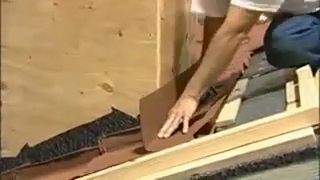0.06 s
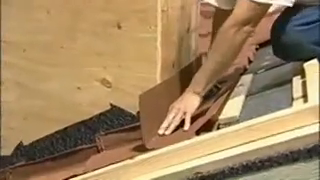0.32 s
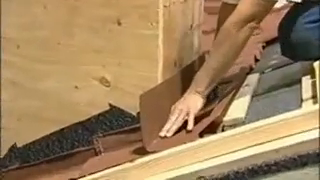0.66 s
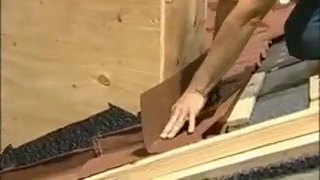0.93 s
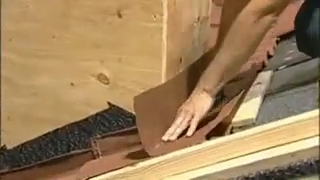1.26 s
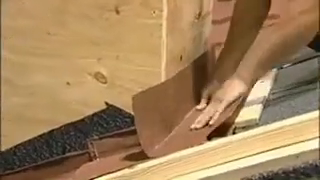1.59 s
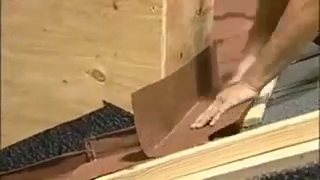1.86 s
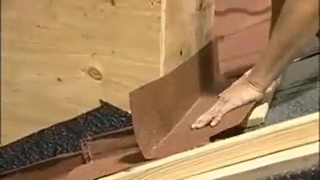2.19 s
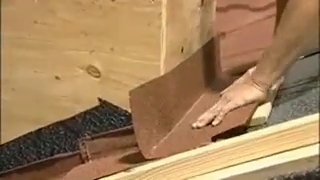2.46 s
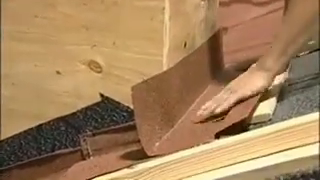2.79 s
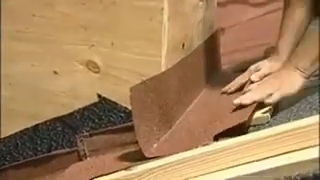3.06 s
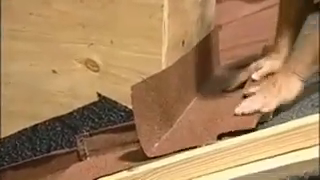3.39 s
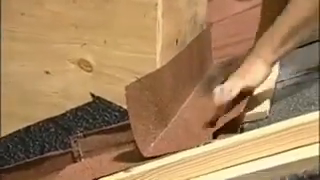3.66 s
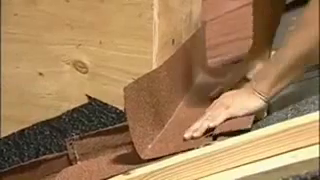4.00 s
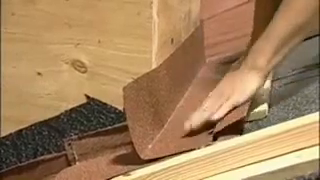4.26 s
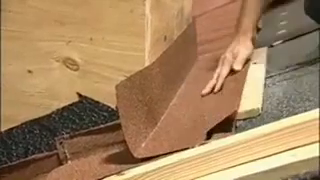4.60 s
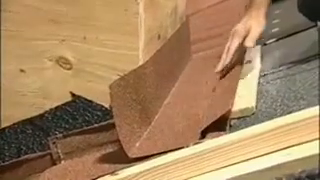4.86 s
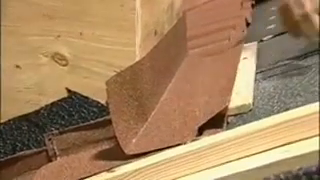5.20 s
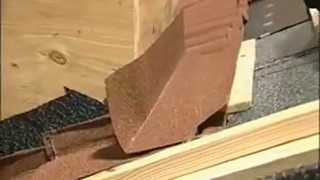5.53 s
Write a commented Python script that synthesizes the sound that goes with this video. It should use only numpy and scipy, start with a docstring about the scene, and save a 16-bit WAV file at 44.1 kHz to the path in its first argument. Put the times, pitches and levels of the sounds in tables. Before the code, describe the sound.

Hands press a gritty coated metal sheet against roof tiles and a wooden box, heard fairly close over a faint steady hiss and hum. Right at the start, a brief palm scrape comes with a sharp click of the edge and a light knock. Soft rubs follow around 0.7 seconds. At 1.2 seconds the sheet snaps onto the wooden deck, by far the loudest sound, with a faint tail from the hard surroundings. Dry, grainy slides and small ticks continue until a lighter snap at 2.2 seconds. From about 2.5 to 4.2 seconds, quiet dull knocks with a short low ring come irregularly, mixed with scuffs, rubs and ticks of the edge on tile. Then the handling thins out: a few tiny ticks near 4.5 seconds, a light hissing stroke at 5 seconds, and a very faint last rub and tick around 5.5 seconds.

```python
"""Hands press a sheet of coated metal flashing into the corner between roof tiles and a plywood box.
Over low hiss and hum, a palm slides on the gritty face, the edge ticks on the tiles and the sheet snaps
onto the wooden deck. The loudest snap comes at 1.2 s, trailing faintly off the hard surroundings.
After a lighter snap at 2.2 s, dull knocks alternate with rubs and ticks until 4.2 s.
A few quiet strokes and last ticks of the edge close the scene."""
import sys
import numpy as np
from scipy import signal
from scipy.fft import rfft, irfft
from scipy.io import wavfile
from scipy.ndimage import uniform_filter1d

SR = 44100
rng = np.random.default_rng(int(sys.argv[2]) if len(sys.argv) > 2 else 0)


def generate_wav(sig):
    """Save sig (samples, or channels by samples) to the path in sys.argv[1] as 16-bit PCM at SR."""
    pcm = np.round(np.clip(np.atleast_2d(sig).T, -1, 1) * 32767).astype(np.int16)
    wavfile.write(sys.argv[1], SR, pcm)


N = 249165


def gain_of(db):
    """Decibels to amplitude."""
    return 10 ** (np.asarray(db) / 20)


def unit_rms(x):
    """Levels a sustained sound to rms 1."""
    return x / np.sqrt(np.mean(x ** 2) + 1e-20)


def unit_hit(x):
    """Levels a transient to the energy of 5 ms at rms 1."""
    return x / np.sqrt(np.sum(x ** 2) / (.005 * SR) + 1e-20)


def curve_at(points, hz):
    """Reads a curve on a log-frequency axis."""
    f, value = np.transpose(points)
    return np.interp(np.log(hz + 1), np.log(f + 1), value)


def add(mix, start_s, sound):
    """Lays a sound into the mix."""
    part = mix[max(round(start_s * SR), 0):][:len(sound)]
    part += sound[:len(part)]


def eq(x, db_at, size=4096):
    """Minimum-phase EQ whose gain in dB is db_at(Hz)."""
    hz = abs(np.fft.fftfreq(size, 1 / SR)) + 1
    log_gain = np.log(gain_of(db_at(hz)))
    response = np.exp(np.conj(signal.hilbert(log_gain)))
    taps = np.fft.ifft(response).real[:size // 2]
    return signal.fftconvolve(x, taps)[:len(x)]


# Tone of the hiss bed: f/Hz, relative level/dB
HISS_EQ = [(15, -34), (25, -13), (49, -16.5), (125, 2), (298, -2), (355, 4.5), (422, -9.5), (478, -0.5),
           (660, -7), (1200, -9.5), (1780, -9.5), (1960, -14), (2170, -13), (6150, -17), (9370, -40),
           (12200, -52), (20600, -120)]
# Hum lines: f/Hz, rms level/dB
HUM_LINES = [(150.7, -85.5), (1351, -94), (1922, -81.5), (3241, -89), (4048, -92), (4646, -97)]
def background(hiss_db=-70, waver_db=0.9):
    """A bed of steady hiss with a few faint, wavering hum lines."""
    t, knots = np.arange(N) / SR, np.linspace(0, N / SR, num=40)
    hiss_gain = gain_of(curve_at(HISS_EQ, np.fft.rfftfreq(N, 1 / SR)))
    hiss = irfft(rfft(rng.standard_normal(N)) * hiss_gain, N)
    out = gain_of(hiss_db) * unit_rms(hiss)
    for hz, db in HUM_LINES:
        waver = waver_db * np.interp(t, knots, rng.standard_normal(len(knots)))
        out += gain_of(db + waver) * np.sqrt(2) * np.sin(2 * np.pi * (hz * t + rng.random()))
    return out


def friction(count, grains_per_s=1500, grain_db=0.5, grain_gain=0.99, catches_per_s=45, catch_gain=7):
    """Texture of the gritty coat: smooth hiss, fine grains and now and then a coarse catch."""
    hiss = rng.standard_normal(count)
    grain_onsets = rng.random(count) < grains_per_s / SR
    grains = grain_onsets * gain_of(grain_db * np.minimum(rng.exponential(1, count), 5))
    catches = (rng.random(count) < catches_per_s / SR) * rng.uniform(1, 4.3, count)
    grit = grain_gain * unit_rms(grains) + catch_gain * catches
    return unit_rms(hiss + np.sign(hiss) * grit)


# Tone of skin on the coated face: f/Hz, relative level/dB
RUB_EQ = [(80, -25.5), (250, -5.5), (600, 8.5), (1200, 2), (2000, -2.5), (3000, -3), (5000, -8),
          (7200, -15), (8300, -25), (9500, -47)]
# Tone of the deck rumbling below: f/Hz, relative level/dB
DECK_EQ = [(40, -38.5), (75, -17.5), (120, 1), (160, -15), (210, 0), (400, 1), (700, -13), (1500, -24),
           (5000, -69.5)]
def slide(attack_s, length_s, db, hollow_hz, hollow_db, tilt_db, rumble_db,
          judder_db=0.85, release_share=0.76, sink_octaves_per_s=2.9):
    """Skin drags over grit: the face hisses, a hollow under the hand sings, and the deck rumbles."""
    t = np.arange(SR // 2) / SR
    slowing_s = length_s - release_share * (length_s - attack_s)
    ramp = np.interp(t, [0, attack_s, slowing_s, length_s], [0, 1, 1, 0])
    speed = np.sin(np.pi / 2 * ramp) ** 2
    air, shake, judder = rng.standard_normal((3, len(t)))
    face = unit_rms(eq(friction(len(t)), lambda f: curve_at(RUB_EQ, f) + tilt_db * np.log2(f / 1000)))
    sweep_hz = hollow_hz * 2 ** (sink_octaves_per_s * (attack_s - t))  # sinks as the hand flattens
    hollow = hand_hollow(air, sweep_hz, width_hz=0.26 * hollow_hz)
    deck = unit_rms(eq(shake, lambda f: curve_at(DECK_EQ, f)))
    grip = gain_of(judder_db * unit_rms(uniform_filter1d(judder, size=300)))
    return gain_of(db) * speed * grip * (face + gain_of(hollow_db) * hollow + gain_of(rumble_db) * deck)


def hand_hollow(air, sweep_hz, width_hz):
    """The air under the hand resonates: two swept band-passes in series."""
    carrier = np.exp(2j * np.pi * np.cumsum(sweep_hz) / SR)
    pole = np.exp(-np.pi * width_hz / SR)
    for _ in range(2):
        air = 2 * (carrier * signal.lfilter([1 - pole], [1, -pole], air / carrier)).real
    return unit_rms(air)


# Slide cues: t/s, attack/s, length/s, level/dB, hollow f/Hz at the end of the attack,
# hollow level/dB re face, tilt/(dB per octave), rumble level/dB re face
STROKE_CUES = [(0.021, 0.019, 0.11, -44, 646, -7.5, 4.5, -9.5),
               (0.067, 0.034, 0.29, -56.5, 4830, -3, 2.5, -4),
               (0.636, 0.036, 0.12, -52, 1220, -5, 2, -12.5), (0.664, .06, 0.16, -50, 920, -1.5, 3.5, -22),
               (1.175, 0.058, 0.096, -43, 1510, -12, 3, -12),
               (1.466, 0.11, 0.35, -54.5, 1130, -9.5, 0.16, -20),
               (1.877, 0.098, 0.18, -52.5, 1460, -4.5, 3, -10.5),
               (2.146, 0.027, 0.11, -54.5, 990, -9, 4, -6.5),
               (2.631, 0.035, 0.059, -62, 404, -7.5, 3.5, -1.5),
               (3.068, 0.023, 0.093, -53, 885, -8, 2.3, -10), (3.108, 0.035, 0.17, -57, 920, 3, 4.5, 1.5),
               (3.301, 0.044, 0.15, -71.5, 690, 1, 2.5, 4.5),
               (3.643, 0.011, 0.34, -66, 1600, -8.5, 2.5, -4),
               (3.786, 0.029, 0.068, -56.5, 1620, -6, 1.5, -3),
               (3.839, 0.0092, .05, -53, 3550, -3.5, 4.5, -3.5),
               (3.85, 0.033, 0.17, -59.5, 553, -2, 1.5, -1),
               (4.081, .006, 0.077, -59.5, 884, -20, 1.5, -8.5),
               (4.301, 0.095, .17, -67, 1500, -16.5, 1.5, 1.5),
               (4.992, 0.055, 0.14, -67, 1510, 3, 7, -19.5), (5.028, 0.045, .11, -61, 4620, -0.5, 6.5, -23),
               (5.231, 0.079, .43, -72.5, 1500, -14, 5, -5.5)]
def strokes():
    """The hands smooth the sheet and shift it into the corner."""
    out = np.zeros(N)
    for start_s, *stroke in STROKE_CUES:
        add(out, start_s, slide(*stroke))
    return out


def chatter(t60, click_db=-5, shiver_db=-11, shiver_t60=0.017):
    """One sharp contact, a quickly dying rattle of tiny ones, and a brief shiver of the sheet."""
    t = np.arange(SR // 8) / SR
    decays = np.exp(-np.log(1000) * t / np.array([[t60], [shiver_t60]]))
    rattle, shiver = rng.standard_normal((2, len(t))) * decays
    click = signal.unit_impulse(len(t))
    return unit_hit(rattle) + gain_of(click_db) * unit_hit(click) + gain_of(shiver_db) * unit_hit(shiver)


# Tone of the metal edge on tile, for ticks and cracks: f/Hz, relative level/dB
EDGE_EQ = [(100, -21.5), (500, 4), (1400, -3), (2100, -4), (3500, -4), (5500, -3), (7200, -8.5),
           (8200, -17.5), (9500, -26)]
def tick(db, hz, focus_db=1.53, t60_halving_db=15):
    """The edge catches on tile grit: firm catches are crisp, light ones chatter longer."""
    t60 = .025 * 2 ** (-(db + 50.5) / t60_halving_db)
    shelf_db = 4 * np.log2(hz / 4000)  # low-pitched catches are duller overall
    catch = eq(chatter(t60), lambda f: curve_at(EDGE_EQ, f) + shelf_db * np.tanh(np.log2(f / 2500)))
    focused = eq(catch, lambda f: -focus_db * np.minimum(np.log2(f / hz) ** 2, 4))
    return gain_of(db) * unit_hit(focused)


# Edge tick cues: t/s, level/dB, centre f/Hz
TICK_CUES = [(0.034, -54, 4460), (0.0542, -26.5, 4700), (0.2064, -45.5, 3550), (0.509, -61, 3010),
             (0.645, -56, 4230), (1.0143, -65, 2930), (1.3988, -39.5, 2560), (1.7386, -50.5, 4800),
             (1.8418, -48.5, 3400), (1.849, -51.5, 2790), (1.927, -47.5, 4940), (2.1266, -56, 1996),
             (2.1657, -44.5, 5460), (2.6676, -56, 3550), (2.8085, -55.5, 3960), (2.9688, -65, 3460),
             (3.028, -59.5, 1990), (3.6278, -59, 4030), (3.6791, -52, 4000), (3.846, -54.5, 4000),
             (4.3317, -61.5, 3635), (4.3879, -65, 3530), (4.48, -58.5, 2244), (4.512, -50.5, 2790),
             (4.9975, -65, 5920), (5.509, -67, 2490)]
def ticks():
    """The edge catches here and there as the sheet shifts."""
    out = np.zeros(N)
    for start_s, db, hz in TICK_CUES:
        add(out, start_s, tick(db, hz))
    return out


# Tone of the sheet's dense modes: f/Hz, relative level/dB
CLATTER_EQ = [(50, -23), (120, -2), (160, -19), (210, -6.5), (400, -2.5), (800, -5), (1700, -13.5),
              (2500, -11), (4200, -15.5), (6000, -35), (9500, -34)]
# Their decay: f/Hz, t60/s at damping 1
CLATTER_DECAY = [(100, 0.13), (500, 0.21), (1600, 0.037), (4000, 0.09), (9000, .045)]
def clatter(count, damping):
    """The sheet's dense modes blur into noise, each band dying at its own speed."""
    hz, t, bands = signal.stft(rng.standard_normal(count), SR, nperseg=256)
    t60 = curve_at(CLATTER_DECAY, hz)[:, None] / damping
    burst = signal.istft(bands * np.exp(-np.log(1000) * t / t60), SR, nperseg=256)[1][:count]
    return eq(burst, lambda f: curve_at(CLATTER_EQ, f))


# Sheet and deck ringing together: f/Hz, relative level/dB, t60/s at damping 1
SHEET_MODES = [(108.3, -10.5, 0.51), (125.6, -11, 0.41), (206, -0.5, 0.15), (237, -10.5, 0.38),
               (246.8, -5, 0.21), (301.8, -6, 0.22), (354, -7, 0.11), (373, -0.5, 0.091), (473, 0, 0.077),
               (525, -3.5, 0.063), (627, -15, 0.061), (800, -7, .07), (1046, -6, 0.057),
               (1118, -4.5, 0.052), (1300, -0.5, 0.021), (1380, -22, 0.02), (1527, 4.5, .033),
               (1743, -3, .04), (2016, -1, 0.039), (2740, -11.5, 0.062), (3400, -11, .025),
               (4140, -6.5, 0.024)]
def knock(db, corner_hz, spot_hz, damping, clatter_db=-3, boost_db=3, spot_db=5, spot_octaves=0.23):
    """The sheet hits the deck: a soft, heavy palm wakes the low modes, a hard, light snap the high ones."""
    t = np.arange(SR // 2) / SR
    hz, mode_db, t60 = np.transpose(SHEET_MODES)[:, :, None]
    polarity = (-1) ** np.arange(len(hz))[:, None]  # neighbouring modes start in opposite directions
    decays = np.exp(-np.log(1000) * t * damping / t60)
    ring = (polarity * gain_of(mode_db) * np.sin(2 * np.pi * hz * t) * decays).sum(0)
    body = unit_hit(ring) + gain_of(clatter_db) * unit_hit(clatter(len(t), damping))
    low_cut_hz = 195 * (corner_hz / 1000) ** 0.657  # softer blows reach deeper
    body = eq(body, lambda f: -10 * np.log10((1 + (f / corner_hz) ** 2) * (1 + (low_cut_hz / (f + 20)) ** 4)))
    # Each spot on the sheet favours some modes.
    body = eq(body, lambda f: spot_db / (1 + (np.log2(f / spot_hz) / spot_octaves) ** 2))
    return gain_of(db + boost_db) * unit_hit(body)


def crack(db, corner_hz, t60=0.036, attack_cycles=0.79):
    """The edge cracks against the tile as a press lands; a soft contact is duller and closes slower."""
    high_cut_hz = 2.7 * corner_hz
    edge = eq(chatter(t60), lambda f: curve_at(EDGE_EQ, f) - 10 * np.log10(1 + (f / high_cut_hz) ** 2))
    t = np.arange(len(edge)) / SR
    attack = 1 - np.exp(-t * corner_hz / attack_cycles)
    return gain_of(db) * unit_hit(edge * attack)


# Press cues: t/s, base level/dB, hardness as corner f/Hz, spot resonance f/Hz,
# hand damping/factor, crack level/dB re base
PRESS_CUES = [(0.0552, -39, 1420, 637, 0.77, 6.5), (1.2284, -18, 2900, 1882, 1.55, -12.5),
              (2.1819, -46.5, 2400, 1040, 1.1, 0.5), (2.1961, -39.5, 950, 557, 1.16, -3),
              (2.4745, -55, 1100, 1450, 2.6, -2.5), (2.493, -50, 450, 325, 0.74, -7),
              (2.7412, -42.5, 770, 297, 1.2, -14), (3.15, -48, 410, 120, 0.49, -8),
              (3.4749, -40.5, 526, 744, 1.64, -11.5), (3.6800, -51, 600, 410, 2.2, -1),
              (3.916, -47.5, 500, 538, 0.74, -21), (4.1368, -41.5, 600, 800, 2.4, -14.5),
              (4.1410, -49, 400, 210, 1.4, -31), (4.167, -53, 320, 240, 0.27, -15),
              (4.234, -63, 400, 303, 0.59, -14)]
# The sheet settling after a hard snap: delay t/s, level/dB re snap
SNAP_REBOUNDS = [(.007, -15.5), (.02, -19.5)]
def presses(snap_above_hz=1300, scuff_lead_s=.022):
    """Each press: the palm skids, the sheet knocks and cracks; a hard snap ends in dull rebounds."""
    out = np.zeros(N)
    for start_s, db, corner_hz, spot_hz, damping, crack_db in PRESS_CUES:
        scuff = slide(attack_s=0.0097, length_s=0.072, db=-36 + 0.62 * db, hollow_hz=spot_hz,
                      hollow_db=-4.5, tilt_db=1.6, rumble_db=4)
        add(out, start_s - scuff_lead_s, scuff)
        add(out, start_s, knock(db, corner_hz, spot_hz, damping))
        add(out, start_s, crack(db + crack_db, corner_hz))
        if corner_hz > snap_above_hz:  # on softer presses the palm holds the sheet down
            for delay_s, rebound_db in SNAP_REBOUNDS:
                rebound = knock(db + rebound_db, .27 * corner_hz, spot_hz=292, damping=damping)
                add(out, start_s + delay_s, rebound)
    return out


# Decay of the surroundings: f/Hz, t60/s
REVERB_DECAY = [(100, 0.29), (400, 0.72), (1500, 0.98), (4000, 1.23), (9000, 1.14)]
def reverb(x, wet_db=-12.0, tilt_db_per_octave=-0.5, blur_octaves=0.057, predelay_s=0.0091):
    """Hard surroundings return a diffuse tail: energy spreads to nearby pitches and dies band by band."""
    frames = dict(fs=SR, nperseg=512, noverlap=384)
    hz, t, bands = signal.stft(x, **frames)
    octave = np.log2(hz + 40)
    blur = np.exp(-((octave[:, None] - octave) / blur_octaves) ** 2)
    power = blur / blur.sum(0) @ abs(bands) ** 2
    feedback = gain_of(-60 * t[1] / curve_at(REVERB_DECAY, hz)) ** 2  # power kept per frame
    tail_power = np.array([signal.lfilter([1 - k], [1, -k], p) for k, p in zip(feedback, power)])
    wet_gain = gain_of(wet_db + tilt_db_per_octave * (octave - np.log2(1000)))
    wash = signal.stft(rng.standard_normal(N), **frames)[2]
    wash *= np.sqrt(tail_power / np.mean(abs(wash) ** 2)) * wet_gain[:, None]
    out = np.zeros(N)
    add(out, predelay_s, signal.istft(wash, **frames)[1])
    return out


def scene():
    """Mono mix of the handling, its tail and the background bed."""
    handling = presses() + strokes() + ticks()
    return (handling + reverb(handling) + background())[None]


def record(dry, low_cut_hz=55, high_cut_hz=9450):
    """Master EQ: a gentle bass roll-off and a steep high cut."""
    thinned = signal.sosfilt(signal.butter(2, low_cut_hz, "highpass", fs=SR, output="sos"), dry)
    high_cut = signal.firwin(401, high_cut_hz, window=("kaiser", 8), fs=SR)
    return signal.oaconvolve(thinned, high_cut[None], "same")


dry = scene()
out = record(dry)
generate_wav(out)
```